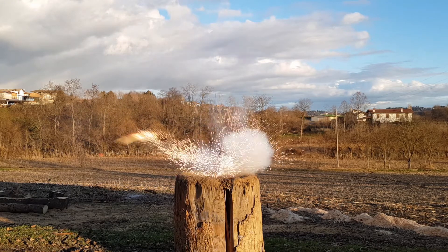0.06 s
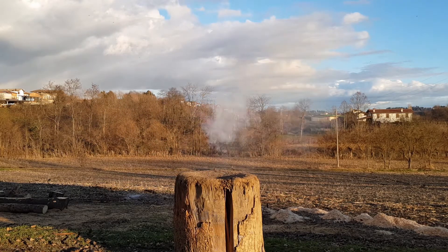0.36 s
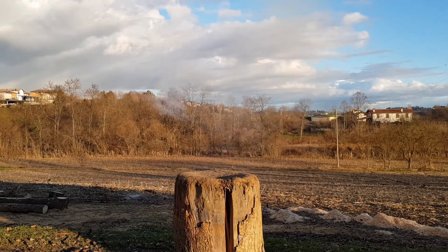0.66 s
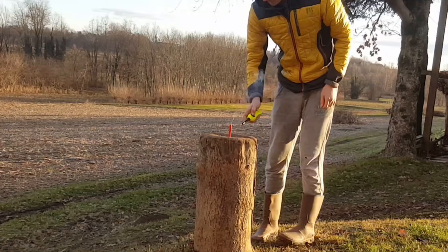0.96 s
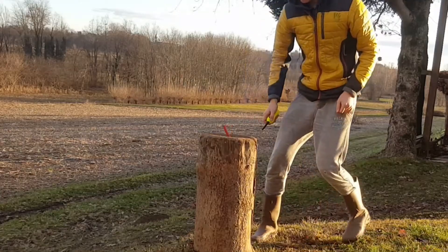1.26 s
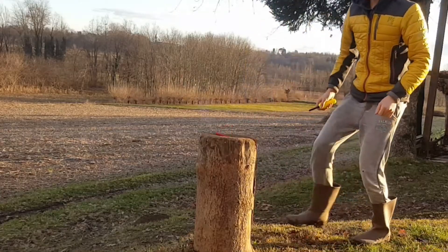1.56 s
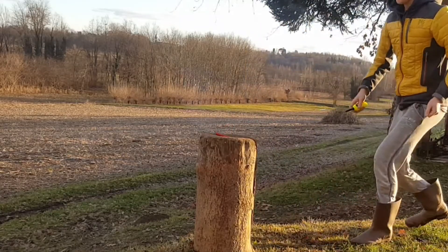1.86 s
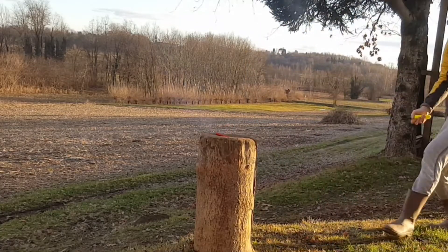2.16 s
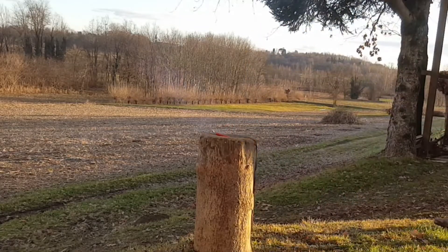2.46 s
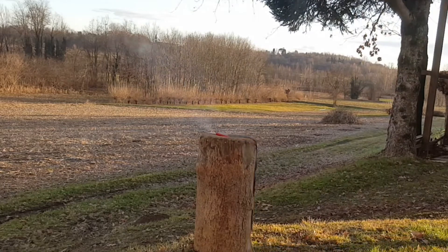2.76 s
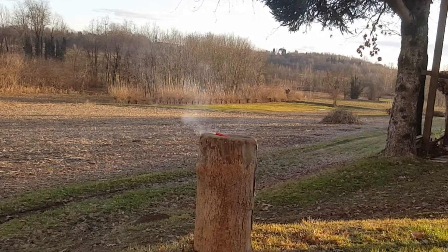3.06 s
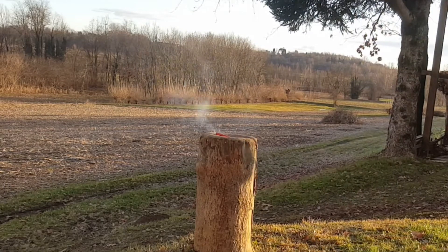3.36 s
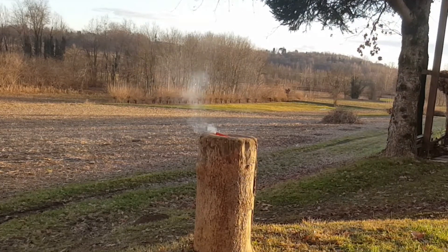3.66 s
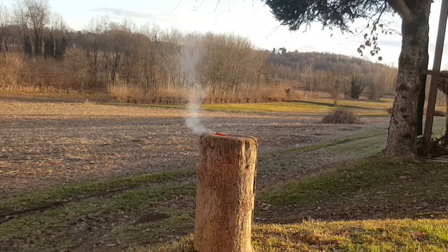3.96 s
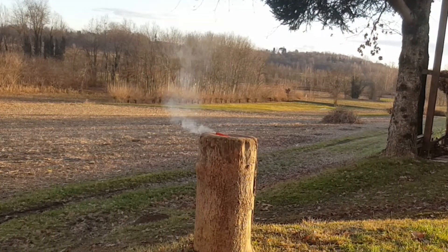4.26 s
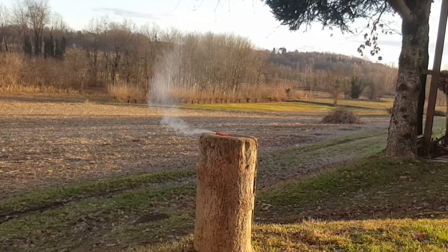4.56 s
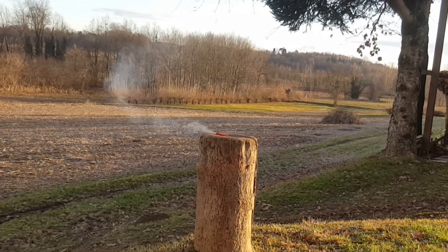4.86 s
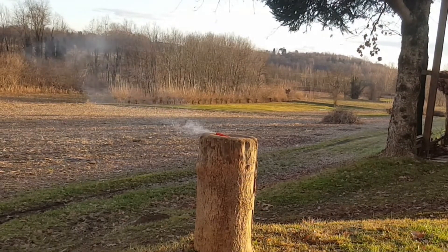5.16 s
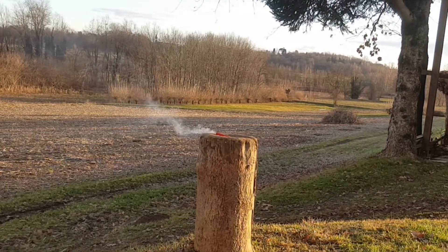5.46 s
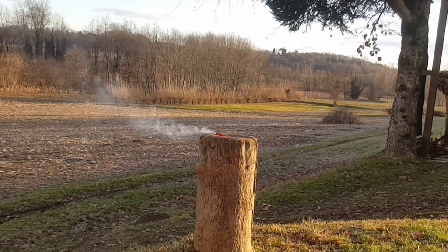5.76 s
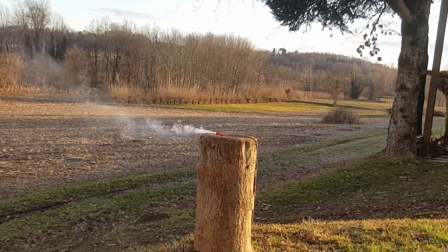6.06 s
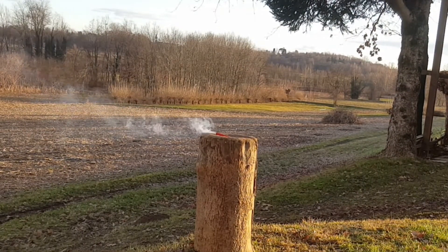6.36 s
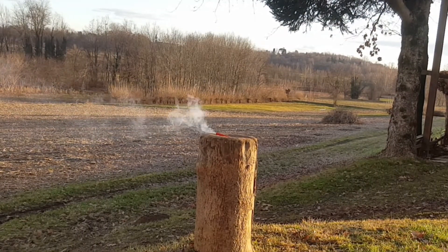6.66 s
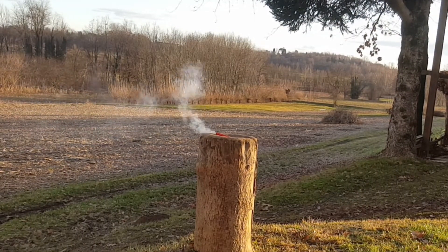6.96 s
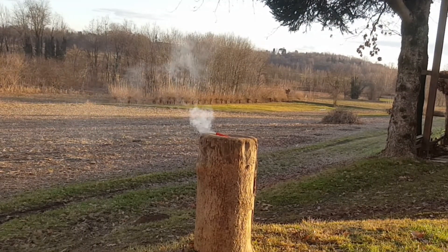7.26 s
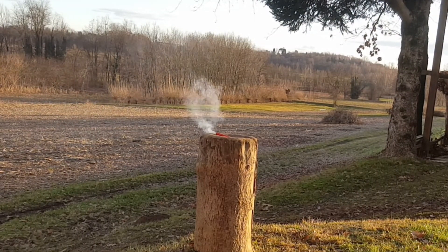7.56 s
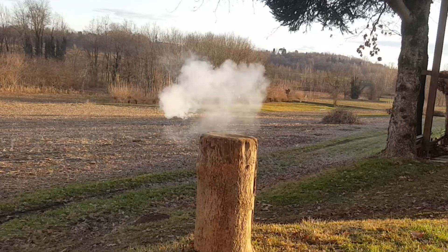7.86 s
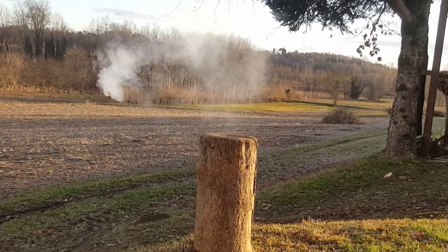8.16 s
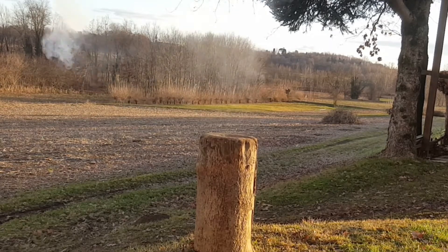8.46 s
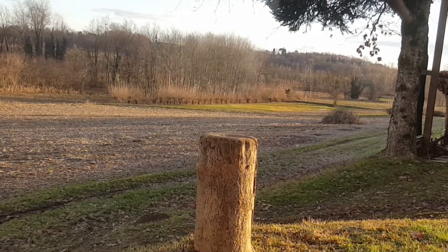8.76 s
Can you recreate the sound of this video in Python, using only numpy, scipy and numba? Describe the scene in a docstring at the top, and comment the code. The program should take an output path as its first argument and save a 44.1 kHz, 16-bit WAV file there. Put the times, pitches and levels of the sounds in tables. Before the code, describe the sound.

Two sharp firecracker blasts echo outdoors, with a quiet fuse sizzling and turning into a hollow, whistling hiss between them.

```python
"""A short sizzle and a sudden bang: the first of two firecrackers goes off on a stump beside a field.
The second fuse hisses and burns down into its cardboard tube, where rushing gas makes the tube sing.
It falters, then explodes. Both blasts overload the microphone, scatter off nearby trees and roll back
from the far woods. Underneath are a faint country rumble, light gusts and a few dull thumps."""
import sys
import numpy as np
from scipy import signal
from scipy.fft import rfft, irfft
from scipy.io import wavfile
from scipy.ndimage import uniform_filter1d
from numba import njit

SR = 44100
rng = np.random.default_rng(int(sys.argv[2]) if len(sys.argv) > 2 else 0)


def to_wav(s):
    """Save 16-bit WAV."""
    ch = np.atleast_2d(s).T  # columns
    pcm = np.round(np.clip(ch, -1, 1) * 32767)  # PCM
    wavfile.write(sys.argv[1], SR, pcm.astype(np.int16))


N = 388962

# One row a blast: start_s, shock_db, crack_db, scatter_db, scatter_fade_s, roll_db, thud_db,
# echo_db, near_echo_lag_s
BLASTS = [(0.09, -3.5, -30.5, -12.5, 0.49, -48, -3, -10.5, 0),
          (7.799, 3, 5.5, -1, 0.59, -31.5, -39.5, 1.5, .0035)]
# Tone of the sound scattered close by, one table a blast: pitch_hz, level_db
SCATTER_TONES = [
    [(35, -38), (60, -8.5), (135, -6), (210, -5.5), (266, -3), (368, -10.5), (627, -5), (1100, -10),
     (1740, -11), (2530, -13.5), (3420, -22.5), (3930, -19), (15500, -33.5)],
    [(35, -65.5), (60, -39), (139, -20), (351, -7), (433, -5), (533, -12), (627, -3), (792, -2),
     (1050, -2.5), (1120, -4.5), (1260, -2.5), (1590, -14.5), (2590, -20), (8470, -34), (15500, -55)],
]
# Stereo width of that scatter, one table a blast: pitch_hz, side_boost_db
SCATTER_WIDTHS = [
    [(300, -8), (650, 4), (1300, 6.5), (2600, 2), (10000, 3)],
    [(300, -10), (650, -3.5), (1300, 1), (2600, 7.5), (10000, 1)],
]
# Stereo width of the far roll and the woods: pitch_hz, side_boost_db
FAR_WIDTH = [(250, -13.5), (700, 0), (1300, 4), (10000, 1)]
# Two narrow, hollow microphone resonances heard in each bang: pitch_hz, width_hz, boost_db
MIC_RING = [(376, 40, 3.5), (633.5, 27, 7)]
LIT_S, SPARKS_S = 0.73, 5.86  # the second fuse is alight; sparks fly from inside its tube


def undb(db):
    """Turn decibels into a plain multiplier."""
    return 10 ** (np.asarray(db) / 20)


def unit(x):
    """Scale to an average strength (rms) of 1."""
    return x / np.sqrt(np.mean(x ** 2))


def clock():
    """Time of every sample in seconds."""
    return np.arange(N) / SR


def ramp(start_s, length_s):
    """Straight rise from 0 to 1."""
    return np.clip((clock() - start_s) / length_s, 0, 1)


def fade(t, fade_s):
    """Die away by 60 dB every fade_s seconds."""
    return np.exp(-np.log(1000) * t / fade_s)


def add(out, start_s, x):
    """Mix x into out from start_s on."""
    i = int(np.clip(start_s * SR, 0, N - 1))
    out[:, i:i + x.shape[-1]] += x[..., :N - i]


def wander(rate_hz):
    """A smooth random drift, about 1 either way."""
    hold = int(SR / rate_hz)
    steps = np.repeat(rng.standard_normal(N // hold + 1), hold)
    return 1.3 * uniform_filter1d(uniform_filter1d(steps, hold), hold)[:N]


def grains(size, spread_db, length=12):
    """Noise made of tiny bursts of unequal strength."""
    strength = undb(spread_db * np.repeat(rng.standard_normal(size // length + 1), length)[:size])
    return unit(strength * rng.standard_normal(size))


def stereo_noise(size, spread_db, shared):
    """Grainy noise, partly the same on the left and right."""
    common = grains(size, spread_db)
    separate = np.array([grains(size, spread_db) for _ in range(2)])
    return np.sqrt(shared) * common + np.sqrt(1 - shared) * separate


def colour(x, points, power=1):
    """Shape the tone along a curve of (pitch_hz, level_db) points."""
    hz, db = np.transpose(points)
    f = np.maximum(np.fft.rfftfreq(x.shape[-1], 1 / SR), 1)
    return irfft(rfft(x) * undb(power * np.interp(np.log(f), np.log(hz), db)), x.shape[-1])


def band(x, hz, kind):
    """Gently keep the lows, the highs or a band between."""
    return signal.sosfilt(signal.butter(2, hz, kind, fs=SR, output="sos"), x)


def hollow(x, rings):
    """Boost or cut a few narrow bands for a hollow tone."""
    f = np.fft.rfftfreq(x.shape[-1], 1 / SR)
    boost = sum((undb(db) - 1) / (1 + 2j * (f - hz) / width) for hz, width, db in rings)
    return irfft(rfft(x) * (1 + boost), x.shape[-1])


def widen(x, points):
    """Set the stereo width by shaping what left and right do not share."""
    mid = x.mean(axis=0)
    return mid + colour(x - mid, points)


@njit
def moving_band(x, hz, width_hz):
    """Keep a band around a moving pitch."""
    y, mid, low = np.empty(len(x)), 0., 0.
    for i in range(len(x)):
        tuning, damping = np.tan(np.pi * hz[i] / SR), width_hz / hz[i]
        swing = (mid + tuning * (x[i] - low)) / (1 + tuning * (tuning + damping))
        mid, low, y[i] = 2 * swing - mid, low + 2 * tuning * swing, damping * swing
    return y


def resonate(x, hz, width_hz):
    """Make both channels ring around a moving pitch."""
    width_hz = float(width_hz)
    return unit(np.array([moving_band(moving_band(c, hz, width_hz), hz, width_hz) for c in x]))


def gas_jet(path, start_s, rise_s, end_s, gain_db, second_db, third_db, dulling_db_per_s):
    """Gas rushing out of the tube rings it at three pitches, which move together and grow duller."""
    t = clock()
    times, pitches, levels = np.transpose(path)
    first_hz, db = np.interp(t, times, pitches), np.interp(t, times, levels)
    second_hz = 2.72 * first_hz
    # The first sparks damp the overtones, which then clear again.
    choke = ramp(SPARKS_S - .1, 0.33) * np.exp(-np.maximum(t - SPARKS_S, 0) / 0.62)
    overtone_db = -17 * choke - dulling_db_per_s * np.maximum(t - start_s, 0)
    gas = stereo_noise(N, spread_db=4, shared=0.76)
    waver = 1 + .008 * wander(25)
    core = resonate(gas, first_hz * waver, width_hz=660)
    just_below = resonate(gas, 0.97 * first_hz, width_hz=680)
    first = unit(core + undb(-4) * just_below)
    second = resonate(gas, second_hz * waver, width_hz=2300)
    third = resonate(gas, (second_hz + 4800) * waver, width_hz=3200)
    overtones = undb(overtone_db) * (undb(second_db) * second + undb(third_db) * third)
    loudness = undb(db + gain_db + .8 * wander(22)) * ramp(start_s, rise_s) * (t < end_s)
    return (first + overtones) * loudness


def country_air(rumble_db=-57.5, dip_db=-7, return_after_s=0.59, return_s=0.42):
    """Distant rumble and gusts that flutter in the bass; both dip after a blast and come back."""
    # Tone of the rumble: pitch_hz, level_db
    rumble_tone = [(20, -11), (48, 1.5), (90, -5.5), (150, -11), (260, -4), (380, -28), (1000, -23),
                   (2500, -26.5), (6000, -38.5), (15000, -56.5)]
    # Gusts of breeze: peak_s, level_db, half_length_s
    gusts = [(1.7, -60, 0.27), (2.756, -57.5, 0.61), (4.696, -56.5, 0.71), (6.15, -61, 0.6)]
    dip = sum(ramp(s + .1, .1) - ramp(s + return_after_s, return_s) for s, *_ in BLASTS)
    strength = sum(undb(db) * np.exp(-((clock() - s) / half_s) ** 2) for s, db, half_s in gusts)
    rumble = unit(colour(stereo_noise(N, spread_db=3.5, shared=0.91), rumble_tone))
    breeze = unit(band(stereo_noise(N, spread_db=2.5, shared=0.27), [55, 140], "bandpass"))
    breeze *= undb(4.9 * wander(13))
    return (undb(rumble_db) * rumble + strength * breeze) * undb(dip_db * dip)


def powder_spits():
    """The powder spits short spurts of sparks, some of them ringing in the tube."""
    # Spurts: start_s, level_db, fade_s, tube_share (0 to 1)
    spurts = [(0.0235, -28.5, 0.038, 0.69), (3.183, -46.5, 0.077, 0.14), (3.274, -48.5, 0.071, 0),
              (7.733, -39.5, 0.027, 0.8)]
    out, t = np.zeros((2, N)), np.arange(SR // 8) / SR
    for start_s, db, fade_s, share in spurts:
        spurt = band(stereo_noise(len(t), spread_db=-3, shared=0.79), 405, "highpass")
        ring = unit(band(spurt, [2550, 3150], "bandpass"))
        direct = unit(band(spurt, 6500, "lowpass"))
        add(out, start_s, undb(db) * fade(t, fade_s) * (share * ring + (1 - share) * direct))
    return out


def blasts(push_s=0.0013, thud_hz=64, crack_s=0.023, yard_edge_s=0.15, roll_fade_s=2.57):
    """A shock and its crack, scatter from the ground and trees, then a long roll across the field."""
    # Tone of the bright crack: pitch_hz, level_db
    crack_tone = [(100, -28.5), (600, -7), (1300, 3.5), (2800, 0.5), (5000, -13), (9000, -16.5),
                  (15500, -30.5)]
    # Tone of the long roll: pitch_hz, level_db
    roll_tone = [(35, -61.5), (60, -35), (90, -9), (325, -8), (427, -1.5), (478, -11.5), (927, -9),
                 (2260, -8.5), (5250, -23), (14000, -78.5)]
    out, t = np.zeros((2, N)), np.arange(3 * SR // 2) / SR
    for blast, tone, width in zip(BLASTS, SCATTER_TONES, SCATTER_WIDTHS):
        start_s, shock_db, crack_db, scatter_db, fade_s, roll_db, thud_db, *_ = blast
        shock = band((1 - t / push_s) * np.exp(-t / push_s), 7000, "lowpass")  # a push, then suction
        # The overloaded microphone swings back with a low thud.
        overload_thud = -np.sin(2 * np.pi * thud_hz * np.maximum(t - .003, 0)) * fade(t, 0.072)
        crack = unit(colour(stereo_noise(len(t), spread_db=4, shared=0.19), crack_tone))
        crack *= np.exp(-(t / crack_s) ** 2)
        scatter = colour(stereo_noise(len(t), spread_db=5.5, shared=0.21), tone)
        scatter = unit(hollow(scatter, MIC_RING))
        dull = band(scatter, 5400, "lowpass")
        scatter = dull + (scatter - dull) * fade(t, 4.7)  # longer paths lose their treble
        scatter *= fade(t, fade_s) / np.sqrt(1 + (t / yard_edge_s) ** 4)  # trees thin out past the yard
        roll = unit(colour(stereo_noise(len(t), spread_db=5, shared=0.17), roll_tone))
        dull = band(roll, 1700, "lowpass")
        roll = dull + (roll - dull) * np.exp(-(t / .5) ** 2)
        roll *= fade(t, roll_fade_s) * undb(0.59 * wander(60)[:len(t)])
        direct = undb(shock_db) * shock + undb(crack_db) * crack + undb(thud_db) * overload_thud
        around = undb(scatter_db) * widen(scatter, width) + undb(roll_db) * widen(roll, FAR_WIDTH)
        add(out, start_s, direct + around)
    return out


def echoes(slap_rise_s=.0006, slap_fade_s=0.073):
    """Near trunks and walls slap each blast back; the far woods, to the right, return dull swells."""
    # Echoes off trunks and walls: delay_s, level_db, edge_db (bright edge, relative to the echo)
    near_echoes = [(.0235, -3.5, -27), (.045, -9, -29), (.073, -5.5, -22), (.0955, -11.5, -26),
                   (.13, -27, -30), (.172, -25, -4), (.194, -26.5, -24), (.271, -42.5, -16)]
    # Tone of that bright edge: pitch_hz, level_db
    edge_tone = [(500, -7), (3000, 0.5), (7500, 3.5), (10000, -10.5), (15500, -21)]
    # Echoes off the woods: delay_s, level_db, rise_s, fade_s
    far_echoes = [(.434, -39, .001, 0.089), (.582, -42, 0.0025, 0.66), (.731, -45, 0.068, 2.6),
                  (.911, -38, 0.014, 1.15), (1.0, -30, 0.03, 0.57)]
    # Tone of the woods: pitch_hz, level_db
    woods_tone = [(59, -44), (100, -21), (212, -5), (460, -31), (544, -8.5), (1050, -2), (1530, -13.5),
                  (2910, -21.5), (3200, -24.5), (9000, -73), (11700, -109), (19800, -120)]
    out, t = np.zeros((2, N)), np.arange(SR // 2) / SR
    to_right = undb([[-2], [2]])
    stops_s = (LIT_S, N / SR)  # the first blast's late swells break off abruptly at LIT_S
    for blast, tone, width, stop_s in zip(BLASTS, SCATTER_TONES, SCATTER_WIDTHS, stops_s):
        start_s, *_, echo_db, lag_s = blast
        for delay_s, db, edge_db in near_echoes:
            slap = stereo_noise(len(t), spread_db=-2, shared=0.49)
            body = widen(unit(hollow(colour(slap, tone), MIC_RING)), width)
            body *= fade(t, slap_fade_s) * (1 - np.exp(-t / slap_rise_s))
            edge = undb(edge_db - 5.5) * colour(slap, edge_tone) * fade(t, 0.0083)
            add(out, start_s + lag_s + delay_s, undb(echo_db + db) * (body + edge))
        for delay_s, db, rise_s, fade_s in far_echoes:
            noise = stereo_noise(len(t), spread_db=2.5, shared=0.34)
            swell = widen(unit(colour(noise, woods_tone)), FAR_WIDTH)
            swell *= (1 - np.exp(-t / rise_s)) * fade(t, fade_s) * (start_s + delay_s + t < stop_s)
            add(out, start_s + delay_s, to_right * undb(echo_db + db) * swell)
    return out


def burning_fuse(level_db=-56, enters_tube_s=3.56, sinks_s=6.0, falters_s=7.36):
    """Burning grains hiss and sizzle until the tube swallows the flame; later, sparks fizz out."""
    # Tone of the flame: pitch_hz, level_db
    flame_tone = [(150, -30.5), (330, -9.5), (620, -1), (1000, -5.5), (1400, -2.5), (1800, -10.5),
                  (2300, -8), (3500, -7), (4200, -9), (5200, -8.5), (6900, -12), (8800, -7.5),
                  (10900, -14.5), (12500, -13), (15500, -20)]
    t = clock()
    hiss = colour(stereo_noise(N, spread_db=3, shared=0.88), flame_tone)
    hiss /= np.std(band(hiss, [600, 2000], "bandpass"))
    body = colour(hiss, [(1800, 1), (3000, -11), (5000, -19), (8000, -38.5)])
    sizzle = (hiss - body) * undb(0.72 * wander(26))
    catching_db = -5 * (1 - ramp(LIT_S, 0.3))
    body_db = level_db + catching_db - 3 * np.maximum(t - sinks_s, 0)  # fainter deep in the tube
    sizzle_db = level_db + 0.5 + 2.35 * catching_db
    sizzle_db -= 0.8 * np.maximum(enters_tube_s - t, 0)  # the open flame slowly gains strength
    sizzle_db -= 5 * ramp(enters_tube_s, 0.088) + 5 * np.maximum(t - enters_tube_s, 0)
    sparks = colour(sizzle, [(5000, 0.0052), (6200, -9), (11000, -9), (13500, 5)])
    sparks *= undb(-60) * ramp(SPARKS_S - 0.24, 0.48)
    falter = ramp(falters_s, 0.22)
    body *= undb(body_db - 5.355 * falter)
    treble = (sizzle * undb(sizzle_db) + sparks) * undb(-19.95 * falter)
    alight = (t > LIT_S) * (t < BLASTS[1][0])
    return (body + treble) * undb(0.65 * wander(13)) * alight


def from_stump(x, gain_db=-2.5, ground_db=-5, lead_s=.000061):
    """The hiss rings hollowly, bounces off rough ground and reaches the left microphone first."""
    # Hollow bands in the hiss: pitch_hz, width_hz, boost_db
    hiss_ring = [(1417, 92, 5), (2128, 243, 9.5), (2670, 100, 6), (2893, 71, 8.5), (3516, 180, 7.5),
                 (3840, 210, -6.5)]
    # Balance between the sides: pitch_hz, left_minus_right_db
    balance = [(60, 0), (110, -11), (200, -17), (380, 5.5), (700, -3.5), (1290, -4.5), (2380, 1),
               (4400, -7), (8120, 2), (15000, -1.0)]
    f, t = np.fft.rfftfreq(N, 1 / SR), np.arange(SR // 20) / SR
    ground = rng.standard_normal((2, len(t))) * fade(t, 0.061) * (t > .002)
    ground *= undb(ground_db) / np.sqrt(np.sum(ground ** 2, axis=1, keepdims=True))
    ripple = (1 + rfft(ground, N)) / np.sqrt(1 + undb(2 * ground_db))
    spectrum = rfft(hollow(x, hiss_ring)) * ripple * undb(gain_db)
    lead = lead_s / np.hypot(1, f / 14000)  # the lead shrinks in the high treble
    left, right = irfft(spectrum[0], N), irfft(spectrum[1] * np.exp(-2j * np.pi * f * lead), N)
    return np.array([colour(left, balance, .5), colour(right, balance, -.5)])


def dull_thumps(rumble_db=-18):
    """Each thump is about one swing of air pressure with a faint low rumble after it."""
    # Thumps close by: start_s, level_db, pitch_hz
    thumps = [(1.946, -47, 85), (2.132, -42, 107.5), (2.549, -38, 337), (2.597, -35, 254),
              (2.9225, -26, 383), (3.725, -37, 137), (4.57, -39, 118), (6.175, -35, 89)]
    out, t = np.zeros((2, N)), np.arange(SR // 6) / SR
    for start_s, db, hz in thumps:
        swing = np.sin(2 * np.pi * hz * t) * np.exp(-(t * hz) ** 4)
        rumble = unit(band(rng.standard_normal(len(t)), [hz / 3, 1.4 * hz], "bandpass"))
        add(out, start_s, undb(db) * (swing + undb(rumble_db) * rumble * fade(t, 0.27)))
    return band(out, 700, "lowpass")


def scene():
    """Mix the open field: the first fuse burns straight ahead, the second off to the left."""
    # Lowest ring of each tube as gas rushes out: time_s, pitch_hz, level_db
    first_path = [(0, 2600, -39), (.04, 2660, -43.5), (.088, 2600, -36)]
    second_path = [(4.05, 2470, -58.5), (5.23, 2620, -47.5), (5.5, 3160, -47.5), (5.62, 3120, -45.5),
                   (6.3, 3355, -47), (6.54, 3000, -43.5), (6.61, 3130, -45.5), (7.35, 2960, -48),
                   (7.49, 2830, -53), (7.56, 2730, -63), (7.72, 2700, -56)]
    first = gas_jet(first_path, start_s=0, rise_s=0.00079, end_s=BLASTS[0][0],
                    gain_db=-2.5, second_db=-6.5, third_db=-16, dulling_db_per_s=64)
    second = gas_jet(second_path, start_s=3.65, rise_s=0.42, end_s=BLASTS[1][0],
                     gain_db=0, second_db=0, third_db=-8, dulling_db_per_s=3)
    ahead = 0.59 * first.mean(axis=0) + 0.3 * first
    to_left = from_stump(burning_fuse() + second)
    return ahead + to_left + powder_spits() + blasts() + echoes() + dull_thumps() + country_air()


def record(dry, ceiling=.91, low_cut_hz=26, top_hz=15850):
    """The recorder flattens the loudest peaks and cuts the deepest bass and the highest treble."""
    flattened = dry / (1 + np.abs(dry / ceiling) ** 6) ** (1 / 6)
    trimmed = band(flattened, low_cut_hz, "highpass")
    return signal.sosfilt(signal.ellip(10, .1, 80, top_hz, fs=SR, output="sos"), trimmed)


dry = scene()
out = record(dry)
to_wav(out)
```